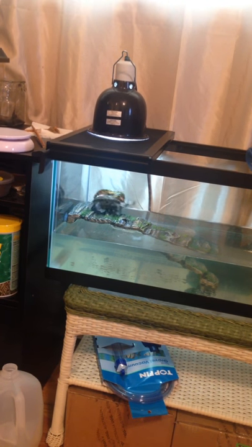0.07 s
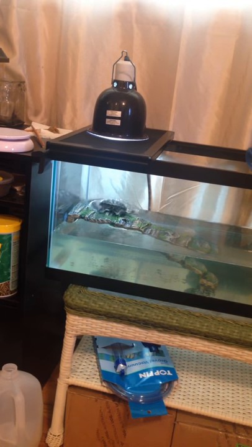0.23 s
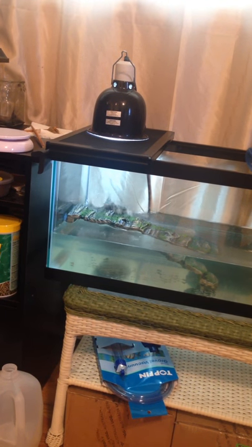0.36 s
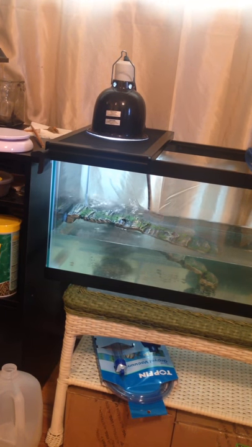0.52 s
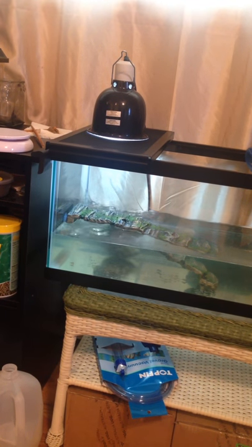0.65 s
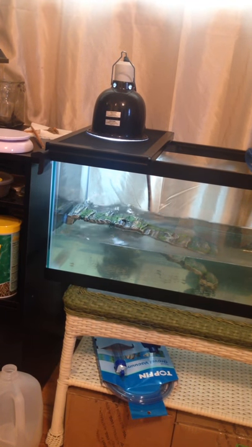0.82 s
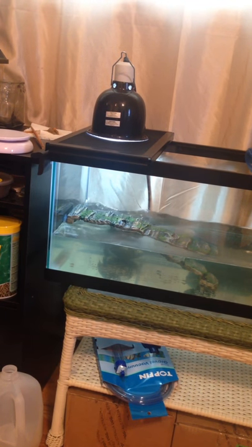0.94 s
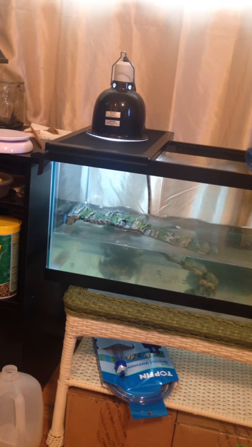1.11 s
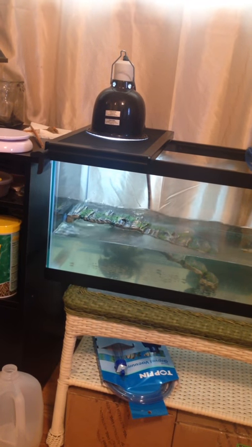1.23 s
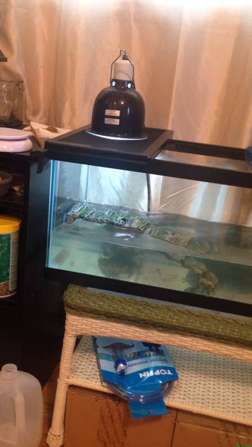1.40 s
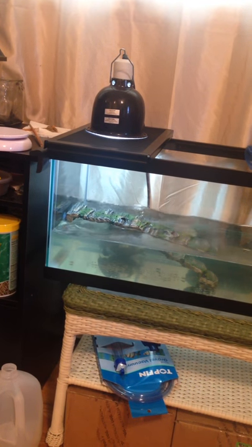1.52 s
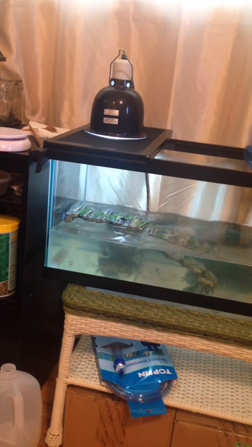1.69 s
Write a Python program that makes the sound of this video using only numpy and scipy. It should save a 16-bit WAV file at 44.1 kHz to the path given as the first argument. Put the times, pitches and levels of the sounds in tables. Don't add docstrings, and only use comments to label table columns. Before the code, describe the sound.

Turtles scramble off a floating dock: light wet slaps and knocks, a sharp bubbly plunge, then plops and drips. Small soft room, phone a few steps away, faint hum and hiss.

```python
import sys
import numpy as np
from scipy import signal
from scipy.fft import rfft, irfft, next_fast_len
from scipy.io import wavfile
from scipy.ndimage import map_coordinates

SR = 44100
rng = np.random.default_rng(int(sys.argv[2]) if len(sys.argv) > 2 else 0)


def wav_out(sig):
    wavfile.write(sys.argv[1], SR, np.round(np.clip(np.atleast_2d(sig).T, -1, 1) * 32767).astype(np.int16))


def attenuation_scalar(level_db):
    decades = np.asarray(level_db, float) / 20
    return 10 ** decades


N = 77175


def unit(x):
    return x / np.sqrt(np.mean(x ** 2) + 1e-20)


def along(points, hz):
    f, v = np.transpose(points)
    return np.interp(np.log(hz + 1), np.log(f + 1), v)


def wobble(rate):
    return map_coordinates(rng.standard_normal(200), [np.arange(N) * rate / SR])


def filtered(x, response):
    m = next_fast_len(N + SR // 2)
    return irfft(rfft(x, m) * response(np.fft.rfftfreq(m, 1 / SR)), m)[..., :N]


def noise(spectrum):
    white = rng.standard_normal(N)
    return unit(filtered(white, lambda hz: attenuation_scalar(along(spectrum, hz))))


def add(track, s, sound):
    part = track[round(s * SR):][:len(sound)]
    part += sound[:len(part)]


# frequency in Hz, decay time t60 in seconds.
ROOM_DECAY = [(150, 0.29), (1000, 0.29), (4000, 0.16), (12000, 0.16)]


def with_room(dry, room_db):
    hz, t, z = signal.stft(rng.standard_normal(SR // 2), SR, nperseg=256)
    decay = attenuation_scalar(-60 * t / along(ROOM_DECAY, hz)[:, None])
    tail = signal.istft(z * decay, SR, nperseg=256)[1]
    delayed = np.pad(dry, (250, 0))
    answer = signal.fftconvolve(delayed, tail / np.linalg.norm(tail))[:len(dry)]
    return dry + attenuation_scalar(room_db) * answer


def swarm(db, hz, spread, t60, count=400):
    when = rng.random(count)
    pitch, life, size = np.clip(rng.standard_normal((3, count)), -2, 2)[:, :, None]
    born = (0.5 * t60 * when ** 1.3)[:, None]
    bubble_hz = np.clip(hz * 2 ** (spread * pitch), 100, 16000)
    cycles = (4.2 + 0.28 / spread) * np.exp(0.22 * life)
    tau = cycles / bubble_hz / 3
    t = np.arange(round((0.5 * t60 + 0.03) * SR)) / SR
    age = np.clip(t - born, 0, None)
    turns = bubble_hz * age * (1 + 0.026 * np.minimum(age / tau, 4) / 4)
    swell = 1 - 0.36 * np.exp(-born / 0.002)
    gain = attenuation_scalar(db + 4.5 * size - 60 * born / t60) * np.sqrt(t60 / tau / count) * swell
    soft_birth = (1 - np.exp(-age / (0.22 * tau))) ** 2
    return np.sum(gain * np.exp(-age / tau) * soft_birth * np.sin(2 * np.pi * turns), axis=0)


# start in seconds, level in dB, bubble pitch in Hz, pitch spread in octaves, t60 in seconds.
SCRAMBLE_SLAPS = [(0.116, -56.5, 4400, 0.17, .12), (0.119, -52, 10200, 0.046, 0.14),
                  (.15, -60, 13500, 0.068, 0.11), (0.228, -51.5, 1950, 0.16, 0.083),
                  (0.239, -50.5, 5900, 0.18, 0.1), (.234, -53, 8600, 0.22, .12),
                  (.234, -60, 13000, .2, .12), (0.241, -55.5, 2510, 0.18, 0.22),
                  (0.248, -54, 4300, 0.16, 0.25), (.262, -49, 8300, 0.17, 0.11),
                  (.284, -61, 8900, 0.19, .1), (.305, -49.5, 3700, 0.37, .2),
                  (0.262, -53.5, 1500, 0.43, 0.1)]
PLUNGE_SPLASHES = [(.319, -34.5, 3670, 0.19, .07), (.327, -36.5, 1910, 0.16, .25),
                   (.406, -49.5, 5500, 0.44, 0.2), (.332, -43.5, 1330, 0.21, 0.22),
                   (.326, -46, 2900, 0.21, .12), (.324, -43.5, 4000, 0.2, .25),
                   (0.328, -56.5, 6800, 0.21, 0.3), (0.36, -64, 10200, 0.19, .25),
                   (.3655, -48.5, 11500, 0.18, 0.06), (.372, -53, 8000, 0.34, .12),
                   (.38, -49.5, 3900, 0.23, .25), (.376, -43.5, 2000, 0.14, 0.13),
                   (.426, -46.5, 1600, 0.23, .12), (.427, -44.5, 3870, 0.16, 0.19),
                   (.436, -49.5, 4400, .12, .08), (.4255, -48.5, 5360, 0.28, 0.2),
                   (.4255, -39.5, 7580, 0.38, 0.079)]
FALLING_DRIPS = [(.526, -50.5, 1429, 0.13, 0.14), (0.556, -42.5, 2460, 0.079, 0.052),
                 (.555, -44, 3900, 0.07, 0.079), (0.5587, -45, 9630, 0.06, 0.08),
                 (.559, -49.5, 12600, 0.04, 0.067), (.559, -50, 14600, .04, .035),
                 (.538, -59, 6500, 0.34, 0.16), (0.559, -52, 6900, 0.15, 0.15),
                 (.574, -54.5, 2560, 0.046, 0.19), (0.61, -54, 3580, 0.3, 0.1),
                 (.611, -50.5, 1400, 0.11, .05), (1.11, -63.5, 1810, 0.43, 0.21),
                 (1.233, -55.5, 2780, 0.31, 0.04), (1.233, -54.5, 5350, 0.19, 0.029),
                 (1.607, -51, 10800, 0.1, 0.02), (1.608, -51.5, 6500, 0.25, 0.028)]


def splashes():
    out = np.zeros(N)
    for s, db, hz, spread, t60 in [*SCRAMBLE_SLAPS, *PLUNGE_SPLASHES, *FALLING_DRIPS]:
        dry = np.pad(swarm(db, hz, spread, t60), (0, SR // 4))
        add(out, s, with_room(dry, room_db=-4))
    return out


# start in
# seconds, level in dB, pitch in Hz, t60 in seconds, pitch rise per second.
SINGLE_RINGS = [(.262, -45, 8500, 0.007, 2), (.283, -39.5, 724, 0.05, 4.6), (.319, -33.5, 3860, 0.022, 2.7),
                (.3205, -31.5, 4000, 0.009, 2), (.324, -23, 1936, 0.014, 3.7),
                (.3303, -21, 1970, 0.011, 1.8), (.337, -27, 1730, 0.013, 3), (.346, -28.5, 2110, 0.015, 2),
                (.352, -32.5, 1696, 0.029, 2.5), (.361, -29, 1960, .012, 1.8),
                (.3655, -21.5, 735, 0.036, 4.5), (.366, -38, 3620, 0.026, 1.8), (.377, -35, 2240, 0.016, 3),
                (.428, -40, 1668, 0.043, 1.5), (.555, -37.5, 2000, 0.014, 3), (.566, -39, 2593, 0.037, 0.25),
                (.403, -43, 696, 0.021, 2), (.617, -35, 389, 0.044, .3), (0.6324, -28.5, 199, 0.053, .3),
                (1.6075, -40.5, 11000, 0.0055, 1), (.616, -45, 1026, 0.055, 0.46),
                (.623, -43.5, 818, 0.037, .5), (.5588, -38, 9180, .006, 1), (1.6075, -48, 5650, .006, 1),
                (1.2335, -52, 4900, 0.0074, 1), (.5555, -41, 2700, 0.011, 1)]


def plops():
    out, t = np.zeros(N), np.arange(SR // 6) / SR
    for s, db, hz, t60, rise in SINGLE_RINGS:
        birth = 1 - np.exp(-t * hz / 1.2)
        turns = hz * t * (1 + 0.5 * rise * t)
        plop = attenuation_scalar(db - 60 * t / t60) * birth * np.sin(2 * np.pi * turns)
        dry = np.pad(plop, (0, SR // 4))
        add(out, s, with_room(dry, room_db=-11))
    return out


TANK_ROOM_DB = -9.5

# frequency in Hz, level in dB.
TANK_MODES = [(73, -1), (138, -9.5), (165, -3.5), (205, 2), (265, -1), (305, 1.5), (360, -1), (431, -3),
              (517, 0), (641, 4), (738, 4), (805, 2.5), (930, 4), (1050, 5)]
# start in seconds, level in dB,
# pitch the blow favours in Hz, its reach in octaves.
TANK_KNOCKS = [(0.149, -49, 224, 0.28), (0.178, -56, 254, 0.6), (0.183, -39.5, 293, 0.35),
               (0.197, -41, 340, 0.66), (.185, -49, 647, 0.07), (.240, -46, 212, 0.83),
               (0.299, -45.5, 224, 0.27), (.366, -34.5, 393, 0.33), (.381, -35, 680, 0.14),
               (.43, -68, 620, 0.21), (.27, -47, 624, 0.16), (.384, -39.5, 214, 0.11),
               (.395, -39, 210, 0.11), (0.421, -51, 201, .3), (.462, -47.5, 195, 0.78),
               (.555, -44.5, 630, 0.55), (0.6135, -49, 949, 0.21), (0.6155, -42, 390, 0.16),
               (.625, -42.5, 850, 0.34), (.627, -45, 300, 0.22), (.648, -48.5, 853, 0.14),
               (.679, -47.5, 197, 0.38), (0.667, -54, 245.3, 0.32), (0.694, -45, 207.9, 0.14),
               (1.112, -50, 485, 0.78), (1.124, -53.5, 303, .4), (1.111, -55, 900, 0.44),
               (.59, -51, 380, 0.33), (1.163, -54, 139.5, 0.18), (1.486, -57, 170, 0.28),
               (1.502, -53.5, 167, 0.34), (1.715, -57.5, 158, 0.3), (1.740, -54.5, 160, 0.73)]


def knocks():
    out, t = np.zeros(N), np.arange(SR // 2) / SR
    rest_hz, level_db = np.transpose(TANK_MODES)[:, :, None]
    t60 = 0.15 * (200 / rest_hz) ** 0.6
    for s, db, centre_hz, reach in TANK_KNOCKS:
        detune, scatter = rng.standard_normal((2, *rest_hz.shape))
        hz = rest_hz * (1 + 0.025 * detune)
        nearness = np.exp(-0.5 * (np.log2(hz / centre_hz) / reach) ** 2)
        share = nearness * attenuation_scalar(level_db + 2 * scatter)
        modes = share * attenuation_scalar(-60 * t / t60) * np.sin(2 * np.pi * hz * t)
        ring = np.sum(modes, axis=0) / np.linalg.norm(share)
        u = t * centre_hz / 0.095
        push = attenuation_scalar(-3) * u * (2 - u) * np.exp(-u)
        dry = -attenuation_scalar(db) * (ring + push) * (1 - np.exp(-t / 0.0015))
        add(out, s, with_room(dry, TANK_ROOM_DB))
    return out


# start in seconds, level in dB, length in seconds.
PANE_SHOVES = [
    (.3822, -33, .0004),
    (.3836, -33, .0004),
    (.3962, -29, .0004),
    (.6154, -31, .0004),
    (1.177, -47, .0008),
]


def shoves():
    out, t = np.zeros(N), np.arange(SR // 2) / SR
    for s, db, length in PANE_SHOVES:
        u = t / length
        dry = -attenuation_scalar(db) * u * u * (3 - u) * np.exp(-u)
        add(out, s, with_room(dry, TANK_ROOM_DB))
    return out


# time in seconds, firing rate in Hz, level in dB.
ENGINE_PATH = [(0.0, 130, -60), (0.024, 126.5, -75), (0.15, 141.5, -78), (0.232, 135, -63.5),
               (0.652, 135.2, -58), (0.876, 132.7, -66.5), (1.266, 118.5, -64), (1.378, 120.9, -69.5),
               (1.472, 117.4, -62.5), (1.584, 102.2, -68.5), (1.75, 92.5, -64)]


def engine():
    s, hz, db = np.transpose(ENGINE_PATH)
    t = np.arange(N) / SR
    firing_hz = np.interp(t, s, hz) * (1 + 0.0071 * wobble(14.8))
    turns = np.cumsum(firing_hz) / SR
    level_db = np.interp(t, s, db) + 4 * wobble(16.08)
    return np.sqrt(2) * attenuation_scalar(level_db) * np.sin(2 * np.pi * turns)


# frequency in Hz, level in dB.
PUMP_TONES = [
    (495, -75),
    (1085, -80),
]


def pump():
    out, t = np.zeros(N), np.arange(N) / SR
    for hz, db in PUMP_TONES:
        level = attenuation_scalar(db + 3.9 * wobble(9.24))
        out += level * np.sin(2 * np.pi * hz * t + 0.66 * wobble(19))
    return out


# frequency in Hz, density in dB per Hz.
HOUSE_HUM = [(15, -3.5), (25, 3), (114, -1.5), (179, -4.5), (389, -11.5), (493, -14), (690, -16),
             (776, -16), (1400, -26), (1820, -37), (3080, -120)]


def house_hum():
    return attenuation_scalar(-61.5 + 0.61 * wobble(6.34)) * noise(HOUSE_HUM)


# frequency in Hz, density in dB per Hz.
MIC_HISS = [(710, -55), (1200, -8), (1490, -6), (4120, -2.5), (10300, -6), (13900, -5), (15600, -12.5)]


def mic_hiss():
    return attenuation_scalar(-66 + 0.96 * wobble(2.686)) * noise(MIC_HISS)


def scene():
    tank = splashes() + plops() + knocks() + shoves()
    background = engine() + pump() + house_hum() + mic_hiss()
    return (tank + background)[None]


def low_pass(x):
    return signal.sosfilt(signal.butter(12, 16060, fs=SR, output="sos"), x)


def record(dry):
    def band(hz):
        bass_cut = 1 / np.sqrt(1 + (60.6 / (hz + 1)) ** 6)
        return (hz < 15640) * bass_cut
    return low_pass(filtered(dry, band))


dry = scene()
out = record(dry)
wav_out(out)
```